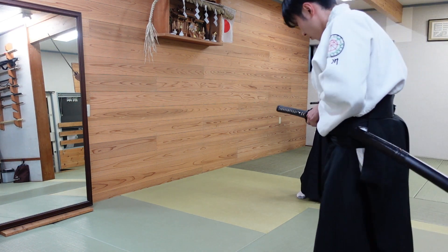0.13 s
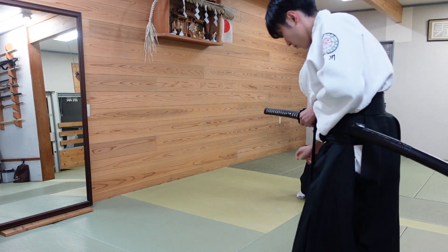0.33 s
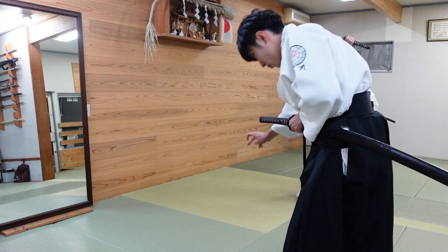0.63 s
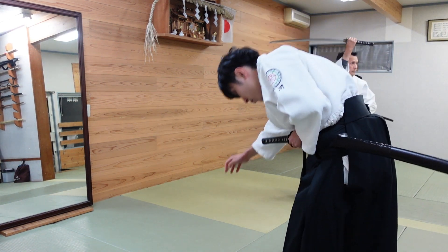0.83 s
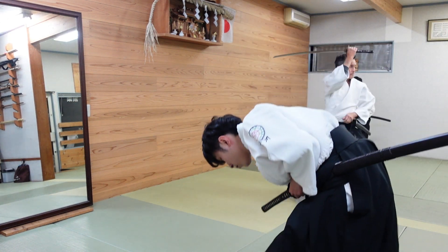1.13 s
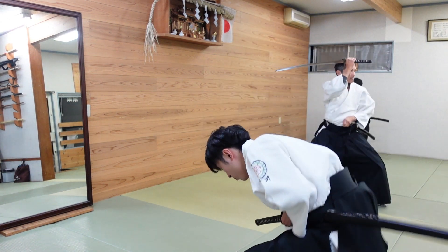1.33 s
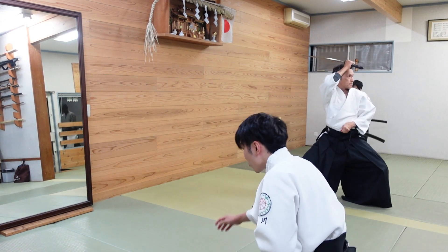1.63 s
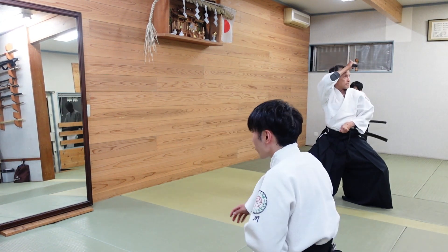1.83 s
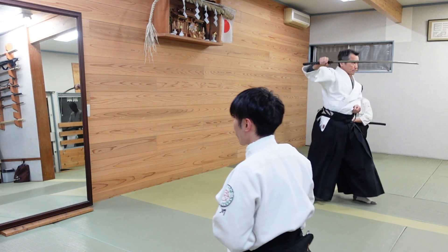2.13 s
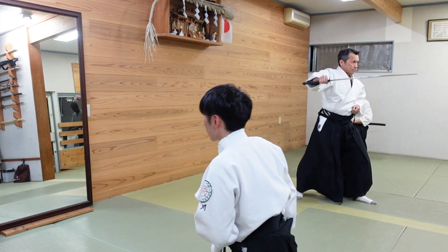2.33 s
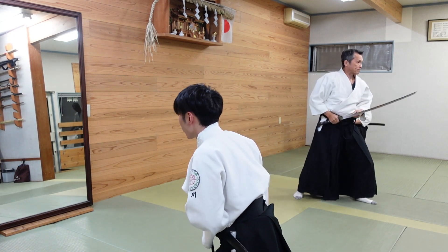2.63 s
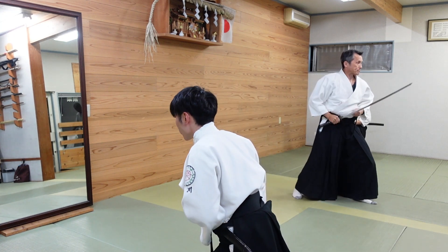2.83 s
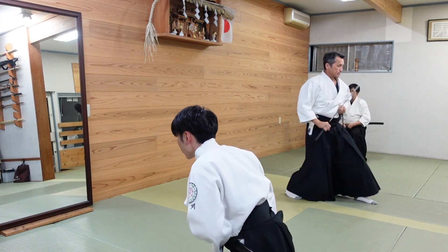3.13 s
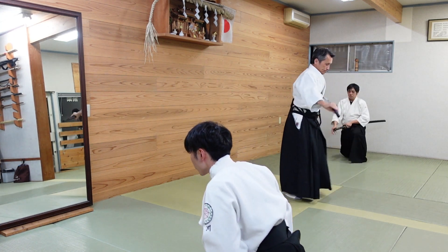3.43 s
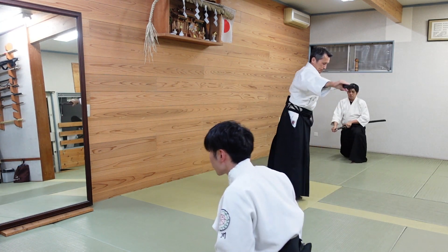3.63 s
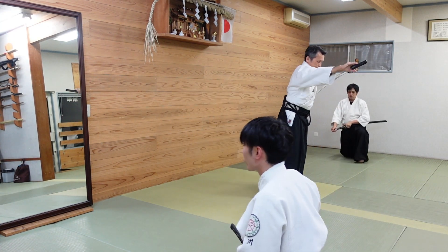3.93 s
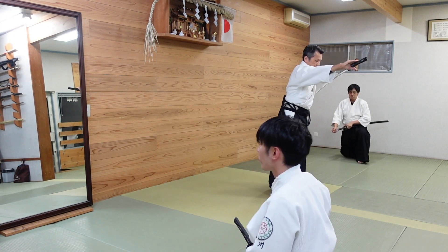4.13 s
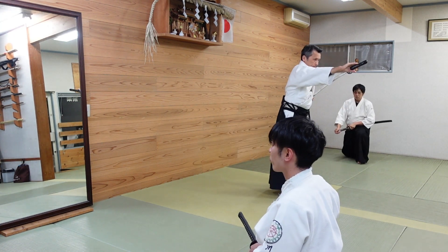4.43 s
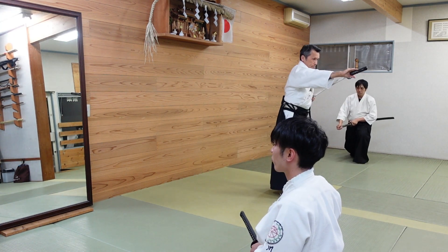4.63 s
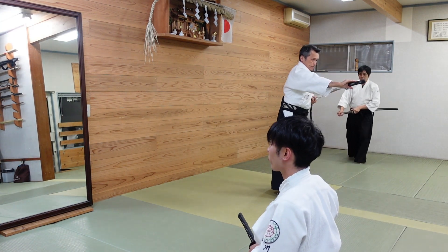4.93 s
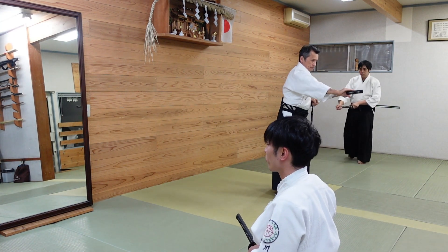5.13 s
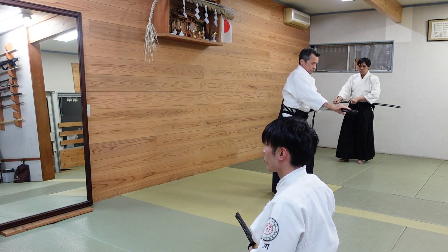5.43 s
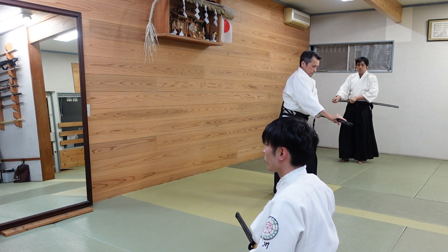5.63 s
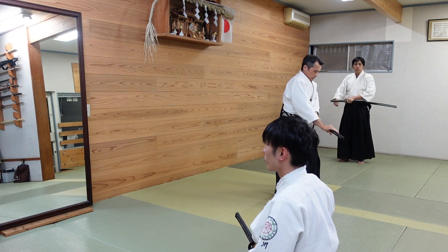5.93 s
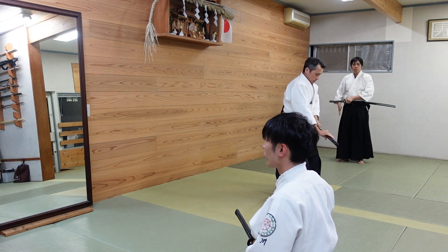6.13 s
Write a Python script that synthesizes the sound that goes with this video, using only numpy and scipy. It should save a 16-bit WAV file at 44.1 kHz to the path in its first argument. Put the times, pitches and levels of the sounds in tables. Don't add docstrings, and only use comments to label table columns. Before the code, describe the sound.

Close stereo pickup in a quiet wood-lined training hall. Cloth snaps crisply at the start, then a sharp swish comes with a short rattle of metal sword fittings. A soft knee thud and mat rasp follow, with a tiny squeak and small knocks. Midway, a loud bright swish with metal clatter and a hard knock stands out. Later rustles are softer, ending with a brief flurry and faint ventilation.

```python
import sys
import numpy as np
from scipy import signal
from scipy.fft import rfft, irfft, next_fast_len
from scipy.io import wavfile

SR = 44100
rng = np.random.default_rng(int(sys.argv[2]) if len(sys.argv) > 2 else 0)


def unload_wav(signal):
    wavfile.write(
        sys.argv[1],
        SR,
        np.round(np.clip(np.atleast_2d(signal).T, -1, 1) * 32767).astype(np.int16),
    )


def convert_level_to_amplitude(level_db):
    exponent = np.asarray(level_db, float) / 20
    return 10 ** exponent


N = 277830

# start_s, rise_s, swish_db, fibre_hiss_db, fall_db_per_s
SWEEPS = [(.0, 0.045, -39.5, -68, 152), (0.085, 0.0031, -52, -39.5, 156), (0.476, 0.0083, -26, -26.5, 143),
          (.95, 0.11, -55, -50.5, 60), (1.125, 0.02, -45, -37, 49), (1.15, .07, -38, -44, 55),
          (1.39, .02, -46, -46, 25), (1.541, 0.0032, -38, -41.5, 46), (1.92, .01, -54.5, -55, 21),
          (2.044, 0.0034, -41.5, -39, 70), (2.096, 0.026, -54, -38.5, 74), (2.141, 0.031, -31.5, -37.5, 87),
          (2.681, 0.016, -46.5, -49, 14), (2.764, 0.012, -43.5, -47, 79), (2.917, 0.0042, -33.5, -53, 82),
          (3.159, 0.033, -23.5, -26.5, 66), (3.286, 0.027, -23.5, -41, 87), (3.883, 0.0043, -48, -40, 77),
          (3.994, 0.041, -39, -39.5, 89), (4.348, 0.0033, -51.5, -61, 47), (4.85, 0.26, -49, -55.5, 33),
          (5.249, 0.0097, -49, -46.5, 200), (5.282, 0.021, -31.5, -33.5, 72), (5.311, 0.061, -39, -35, 107)]
# start_s, level_db, shaking_s, touches_per_s, cloth_meanwhile_db
RATTLES = [
    (.477, -32.5, .02, 2200, -14),
    (.499, -27.5, .055, 2200, -5),
    (2.68, -37, .03, 2200, -6),
    (3.162, -25, .055, 2200, -14),
]
# pitch_hz, likeness (0 to 1)
AIR_LIKENESS = [(60, .99), (250, 0.81), (550, 0.23), (1650, 0.21), (4970, 0.58), (15000, 0.56)]


def rms_one(x):
    return x / np.sqrt(np.mean(x ** 2) + 1e-20)


def at_hz(points, hz):
    table_hz, value = np.transpose(points)
    return np.interp(np.log(hz), np.log(table_hz), value)


def drift(rate_hz):
    hop = 40
    r = np.exp(-2 * np.pi * rate_hz * hop / SR)
    slow = signal.lfilter([1], [1, -2 * r, r * r], rng.standard_normal(N // hop + 2002))
    slow = slow[2000:]
    return np.interp(np.arange(N) / hop, np.arange(len(slow)), rms_one(slow))


def resonance(x, hz, width_hz):
    r = np.exp(-np.pi * width_hz / SR)
    w = 2 * np.pi * min(hz, .45 * SR) / SR
    return signal.lfilter([0, np.sin(w)], [1, -2 * r * np.cos(w), r * r], x + 1e-18)


def panned(x, pan_db):
    return x * convert_level_to_amplitude(np.array([[.5], [-.5]]) * pan_db)


def banded(source, spectrum, likeness, patchy_db, rate_hz, moving_db=lambda hz: 0, far=0):
    out = 0
    edges = 30 * 2 ** np.arange(0, 9.3, .35)
    for k, (low, high) in enumerate(zip(edges, edges[1:])):
        band = signal.butter(2, [low, high], "band", fs=SR, output="sos")
        mid, side = signal.sosfilt(band, source[k % 2])
        hz = np.sqrt(low * high)
        alike = np.clip((1 - far) * at_hz(likeness, hz) + far * at_hz(AIR_LIKENESS, hz), 0, 1)
        gain = convert_level_to_amplitude(at_hz(spectrum, hz) + moving_db(hz) + patchy_db * drift(rate_hz))
        out = out + gain * (np.sqrt(1 + alike) * mid + np.sqrt(1 - alike) * side * [[1], [-1]])
    return out


def friction(slips_per_s, spread_db, smooth):
    zone_edges_hz = [120, 700, 2000, 5000, 15500]
    # pitch_hz, density_db per Hz
    fibre_spectrum = [(24, -64), (40, -36), (123, -34), (162, -13), (213, -17.5), (267, -8), (389, -7),
                      (499, -3.5), (1260, 3.5), (2600, 2.5), (6080, -1.5), (15700, -16)]
    # pitch_hz, likeness (0 to 1)
    near_likeness = [(60, .995), (250, .985), (500, .91), (1000, .78), (2000, .82), (4000, .76),
                     (8000, .66), (14000, .57)]
    far_db, near_db = -55, -32.5

    zone_db, pan_db = zones()
    sizes = convert_level_to_amplitude(spread_db * np.minimum(rng.exponential(1, N), 5))
    slips = sizes * (rng.random(N) < slips_per_s * convert_level_to_amplitude(2.5 * drift(60)) / SR)
    grains = rms_one(signal.lfilter([.1], [1, -.9], slips))
    envelope = np.sqrt(smooth + (1 - smooth) * grains ** 2)
    source = envelope * rng.standard_normal((2, 2, N))

    lift_db = []
    for low, high, wanted_db in zip(zone_edges_hz, zone_edges_hz[1:], zone_db):
        density = np.mean(convert_level_to_amplitude(at_hz(fibre_spectrum, np.linspace(low, high, 50))) ** 2)
        lift_db.append(wanted_db - 10 * np.log10(density * (high - low) * 2 / SR))
    centres = np.log(np.sqrt(np.multiply(zone_edges_hz[1:], zone_edges_hz[:-1])))

    def moving_db(hz):
        shares = np.array([np.interp(np.log(hz), centres, one) for one in np.eye(4)])
        return shares @ np.array(lift_db) + hollows(hz, width_octaves=.3)

    far = np.clip((near_db - np.max(zone_db, axis=0)) / (near_db - far_db), 0, 1)
    rustle = banded(source, fibre_spectrum, near_likeness, patchy_db=1.5, rate_hz=14,
                    moving_db=moving_db, far=far)
    return panned(rustle, np.clip(pan_db, -4, 4))


def zones():
    # start_s, rise_s, thud_db, mat_rasp_db, fall_db_per_s
    presses = [(.01, 0.053, -64, -41, 114), (.085, .012, -57.5, -45, 125), (1.13, 0.082, -26, -37.5, 127),
               (1.38, 0.033, -48, -44.5, 58), (1.562, 0.027, -36.5, -35, 149), (2.08, 0.095, -74, -40, 100),
               (2.681, 0.015, -55.5, -42, 62), (2.918, 0.012, -74, -47, 72), (3.163, .006, -72, -37.5, 29),
               (3.27, 0.077, -75, -48, 85), (3.885, .01, -58, -51, 15), (3.992, 0.044, -33.5, -34.5, 111),
               (4.8, 0.14, -67, -50.5, 35), (5.245, 0.021, -48.5, -45.5, 200), (5.284, 0.026, -61, -41, 46)]
    # time_s, level_db, left_right_db
    stirring = [(0, -50.5, 1), (.3, -54.5, -2), (.44, -56, -1), (.75, -50.5, .3), (1.1, -49.5, .5),
                (1.8, -50, -1), (2.1, -46, 0), (2.5, -49, -2.5), (3.1, -47, -0.5), (3.4, -45, -0.5),
                (3.8, -53.5, 0.5), (4.1, -49.5, 0), (4.7, -52, -0.5), (5.2, -50.5, 0), (5.699, -52, .5),
                (6.3, -52, -1)]
    stirring_zones_db = [-14.5, -6, -3.6, -1.5]

    t = np.arange(0, N + 50, 50) / SR
    stir_s, stir_db, pan_db = np.transpose(stirring)
    faint = convert_level_to_amplitude(2 * (np.interp(t, stir_s, stir_db) + np.array(stirring_zones_db)[:, None]))
    moved = movements(presses, t, rises_db=(20, 12)) + movements(SWEEPS, t, rises_db=(5, 5))
    levels_db = 10 * np.log10(faint + np.array(moved))
    every_s = np.arange(N) / SR
    return [np.interp(every_s, t, level) for level in levels_db], np.interp(every_s, stir_s, pan_db)


def movements(rows, t, rises_db):
    hold_share = 0.24
    start, rise, low_db, high_db, fall = np.transpose(rows)[:, :, None]
    rise = rise + 1e-4
    before_peak = np.minimum((t - start) / rise - 1, 0)
    fall_db = fall * np.maximum(t - start - (1 + hold_share) * rise, 0)
    powers = []
    for peak_db, rise_db in zip((low_db, high_db), rises_db):
        each = (t >= start) * convert_level_to_amplitude(2 * (peak_db + rise_db * before_peak - fall_db))
        powers.append(np.sum(each, axis=0))
    return powers


def hollows(hz, width_octaves):
    # start_s, end_s, centre_hz, lift_db
    fold_lifts = [(0, .2, 1860, 1), (.26, 0.338, 3100, 17), (1.106, 1.396, 883, 8.5),
                  (1.11, 1.287, 4940, 2.5), (1.55, 1.7, 1140, 1), (2.04, 2.503, 1610, 2.5),
                  (2.042, 2.49, 4200, 5.5), (2.08, 2.288, 5940, 4), (2.906, 3.15, 5700, 0),
                  (3.275, 3.43, 2360, 9), (3.308, 3.64, 1530, 7.5), (3.88, 3.99, 7260, 2),
                  (3.97, 4.29, 544, 5.5), (1.197, 1.4, 386, 0.5), (4.332, 4.46, 5030, 6),
                  (4.335, 4.457, 7400, 5.5), (5.29, 5.496, 2100, 3.5), (5.67, 6.4, 1500, 8.5)]
    hop = 100
    out = np.zeros(N // hop + 1)
    t = np.arange(len(out)) * hop / SR
    for start, end, centre_hz, lift_db in fold_lifts:
        lasting = np.clip(np.minimum((t - start) / .03, (end - t) / .09 + .4), 0, 1)
        out += lift_db * lasting * np.exp(-(np.log2(hz / centre_hz) / width_octaves) ** 2)
    return np.repeat(out, hop)[:N]


def cloth_dip():
    t = np.arange(N) / SR
    quiet_db = 0
    for s, _, shaking_s, _, still_db in RATTLES:
        fade = np.exp(-(np.maximum(t - s, 0) / (2.5 * shaking_s)) ** 2)
        quiet_db = quiet_db + still_db * (t >= s) * fade
    return quiet_db


def early(x):
    level_db, decay_s = -8, .012
    out, t = np.zeros((2, N + 2000)), np.arange(2000) / SR
    starts = [round(row[0] * SR) for row in SWEEPS[1:]]
    for a, b in zip([0] + starts, starts + [N]):
        echoes = rng.standard_normal(len(t)) * np.exp(-t / decay_s) * (t > .001)
        echoes *= convert_level_to_amplitude(level_db) / np.sqrt(np.sum(echoes ** 2))
        echoes[0] = 1
        echoes /= np.sqrt(np.sum(echoes ** 2))
        out[:, a:b + len(t) - 1] += signal.fftconvolve(x[:, a:b], echoes[None], axes=1)
    return out[:, :N]


def taps():
    # start_s, peak_db, centre_hz, left_right_db
    snaps = [(.022, -22.5, 3000, -3), (.061, -30, 3200, 0), (.088, -17.5, 3100, -1), (.0895, -22, 2600, -1),
             (.215, -34, 6000, -2), (1.541, -21, 3500, 1), (1.549, -23, 4500, 1), (2.097, -22, 4420, -3),
             (2.345, -35, 10000, -2), (4.349, -28, 5100, 0), (4.374, -33, 5590, 0), (5.095, -33, 4580, 0)]
    # start_s, peak_db, centre_hz, left_right_db
    knocks = [(.047, -22, 1800, 0), (.051, -26, 1900, 0), (.091, -26, 1200, 0), (1.41, -30, 1140, 0),
              (1.554, -24, 3000, 0), (1.572, -19, 1100, -3), (1.599, -22, 1290, 0), (1.70, -31, 5500, 0),
              (1.865, -37, 6200, -2), (1.93, -38, 12500, 0), (2.058, -30, 3200, -1), (2.175, -18, 4300, 0),
              (2.58, -35, 9700, -3), (3.171, -17, 4400, 0), (3.357, -13, 2510, 0), (4.05, -24, 550, 1)]
    # start_s, peak_db, centre_hz, ring_cycles
    pings = [(.479, -35, 1680, 60), (.5, -35, 1660, 60), (.54, -38, 1690, 40), (1.119, -35, 5400, 40),
             (1.145, -32, 5350, 50), (1.16, -33, 5300, 50), (2.59, -35, 1490, 14), (2.95, -32, 1000, 12),
             (5.261, -31, 990, 12), (5.305, -29, 1000, 16), (5.314, -29, 1020, 16)]

    out, t = np.zeros((2, N)), np.arange(2000) / SR
    rows = [(*row, 2.7) for row in snaps] + [(*row, 6) for row in knocks]
    rows += [(s, db, hz, 0, cycles) for s, db, hz, cycles in pings]
    for s, db, hz, pan_db, cycles in rows:
        noise = rng.standard_normal(len(t))
        burst = np.diff(noise * np.exp(-t / .0005), prepend=0)
        ring = resonance(resonance(burst, hz, hz), hz, 2 * hz / cycles)
        tap = ring / np.abs(ring).max() + .09 * burst / np.abs(burst).max()
        at = round(s * SR)
        out[:, at:at + len(t)] += panned(convert_level_to_amplitude(db + 2.5) * tap, pan_db)
    no_bass = signal.butter(2, 300, "high", fs=SR, output="sos")
    return signal.sosfilt(no_bass, out)


def rattles():
    # pitch_hz, width_hz, level_db
    guard = [(1710, 50, -10), (3370, 90, 2.5), (3840, 130, 2), (5060, 29, 5), (5550, 40, 10),
             (5450, 52, -14.5), (6045, 37, 16.5), (6570, 30, 6), (7050, 34, 2), (8270, 120, 4),
             (8970, 110, 3), (9560, 48, -8), (9950, 220, -0.5), (10700, 73, -1)]
    ring_fitting = [(1095, 57, 7.5), (1850, 72, -1), (2390, 81, -1), (3010, 39, 10), (3100, 25, 8),
                    (3470, 56, 5), (4200, 240, 2.5), (4300, 90, -8), (6430, 93, 5.5), (8200, 52, -6),
                    (8350, 67, -2), (9800, 720, -4)]
    collar = [(1725, 28, 1), (1997, 15, 5), (2220, 87, -4), (2917, 59, 7.5), (3190, 13, 15), (3407, 62, 8),
              (4200, 50, 7), (4420, 25, -7), (4560, 80, 6.5), (5270, 91, -4), (5920, 33, 5), (6640, 32, -6),
              (8700, 31, -2), (11100, 120, -8)]

    out, t = np.zeros((2, N)), np.arange(SR // 2) / SR
    for (s, db, shaking_s, per_s, _), modes in zip(RATTLES, (guard, guard, ring_fitting, collar)):
        touches = (rng.random(len(t)) < per_s / SR) * np.exp(-t / shaking_s) * np.minimum(t / .002, 1)
        touches[0] = 1.2
        rings = 0
        for hz, width_hz, level_db in modes:
            for split in (-1, 1):
                uneven = touches * rng.standard_normal(len(t))
                ring = resonance(uneven, hz + split * .7 * width_hz, .55 * width_hz)
                rings = rings + panned(convert_level_to_amplitude(level_db) * width_hz * ring, 4 * rng.standard_normal())
        at = round(s * SR)
        out[:, at:at + len(t)] += convert_level_to_amplitude(db - 9) * rms_one(rings)
    no_bass = signal.butter(4, 900, "high", fs=SR, output="sos")
    return signal.sosfilt(no_bass, out)


def squeak():
    # start_s, end_s, from_hz, to_hz, level_db
    heel_slip = (1.126, 1.142, 5700, 5100, -28.5)
    start, end, from_hz, to_hz, db = heel_slip
    part = np.clip((np.arange(N) / SR - start) / (end - start), 0, 1)
    phase = 2 * np.pi * np.cumsum(from_hz + (to_hz - from_hz) * part) / SR
    return panned(convert_level_to_amplitude(db) * np.sin(np.pi * part) * np.sin(phase), .1)


def hall(x):
    t60_s, wall_cut_hz, wide_above_hz = 1, 4100, 520
    size = next_fast_len(N + SR)
    w = 2 * np.pi * np.arange(size // 2 + 1) / size
    hz = w * SR / (2 * np.pi)
    dull = 1 / (1 + 1j * hz / wall_cut_hz) ** 0.54
    tail = np.zeros((2, len(w)), complex)
    for k, lag in enumerate(rng.uniform(.008, .04, 16) * SR):
        loop = convert_level_to_amplitude(-60 * lag / SR / t60_s) * dull * np.exp(-1j * w * lag)
        tail[k % 2] += loop / (1 - loop) * (-1) ** (k // 2)
    mid = (tail[0] + tail[1]) / 2
    side = (tail[0] - tail[1]) / 2 * hz ** 2 / (hz ** 2 + wide_above_hz ** 2)
    thin = (hz / (hz + 250)) ** 2
    response = np.array([mid + side, mid - side]) * thin
    return irfft(response * rfft(x.mean(axis=0), size), size)[:, :N]


def ventilation():
    # pitch_hz, density_db per Hz
    air_spectrum = [(12, -56), (20, -31.5), (220, -6.5), (291, -6.5), (601, -3.5), (773, -1.5), (864, 11.5),
                    (1310, -22.5), (1550, -4), (2170, 0), (6800, -12), (14400, -15.5), (15700, -52)]
    # pitch_hz, width_hz, level_db
    duct_mode = (1590, 90, -58)
    noise = rng.standard_normal((2, 2, N))
    air = rms_one(banded(noise, air_spectrum, AIR_LIKENESS, patchy_db=1.3, rate_hz=3))
    hz, width_hz, db = duct_mode
    duct = rms_one(resonance(rng.standard_normal(N), hz, width_hz)) * convert_level_to_amplitude(db + 1.2 * drift(1.5))
    return convert_level_to_amplitude(-49.5) * air + duct


def scene():
    cloth = early(convert_level_to_amplitude(cloth_dip()) * friction(slips_per_s=2000, spread_db=2.5, smooth=0.86))
    hard = taps() + rattles() + squeak()
    reverberation = hall(convert_level_to_amplitude(-18.5) * hard + convert_level_to_amplitude(-30) * cloth)
    return cloth + hard + reverberation + ventilation()


def roll_off(x):
    return signal.sosfilt(signal.butter(12, 15860, fs=SR, output="sos"), x)


def record(dry):
    treble_cut = signal.cheby2(10, 40, 16200, fs=SR, output="sos")
    mix = signal.sosfilt(treble_cut, dry)
    return roll_off(mix)


dry = scene()
out = record(dry)
unload_wav(out)
```